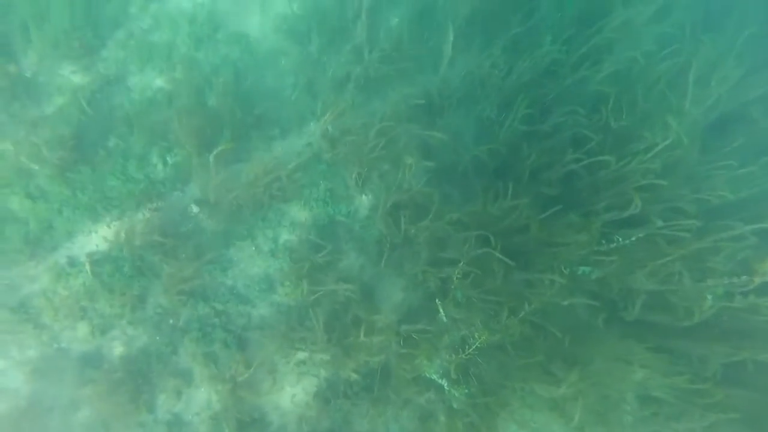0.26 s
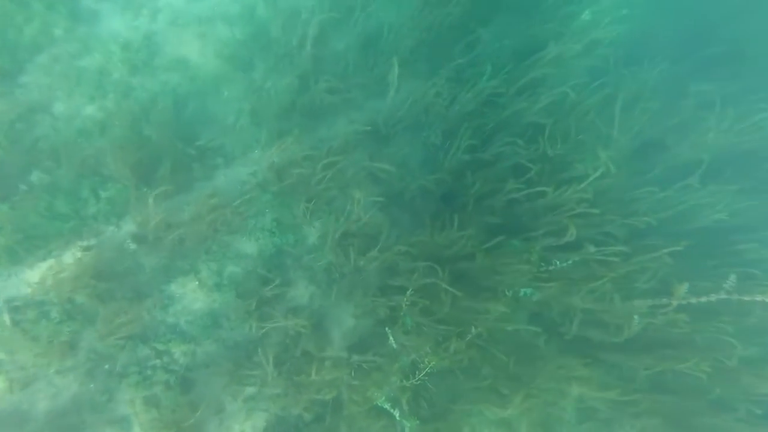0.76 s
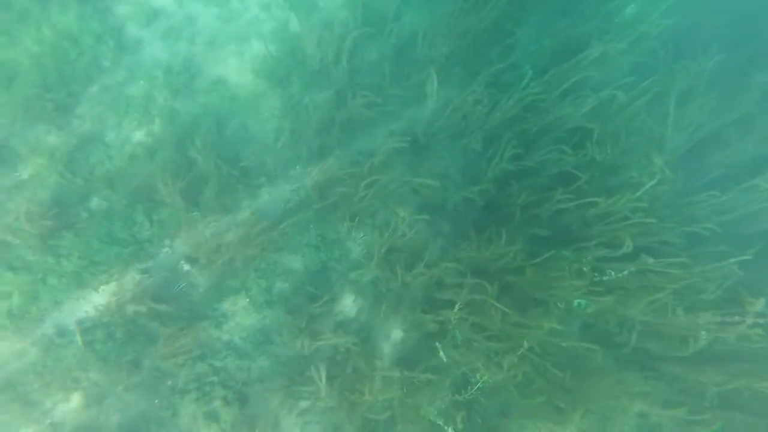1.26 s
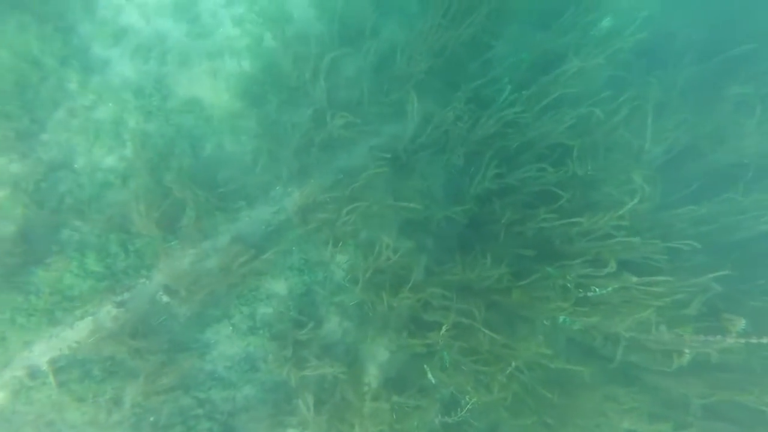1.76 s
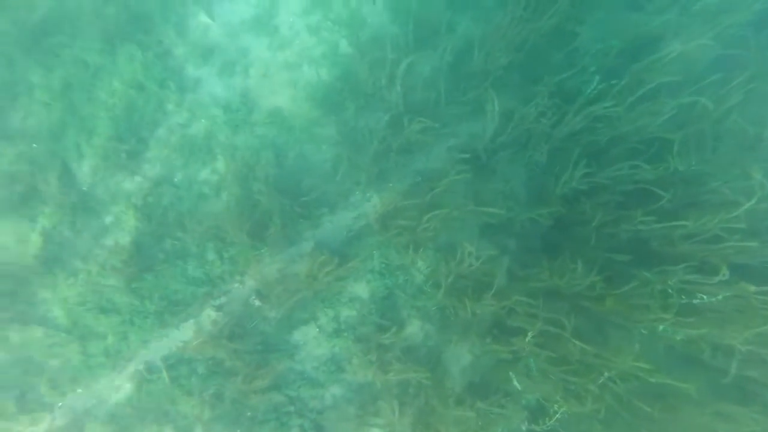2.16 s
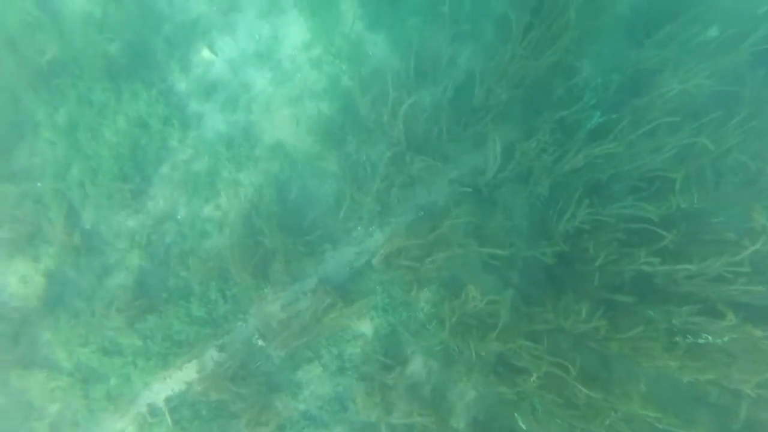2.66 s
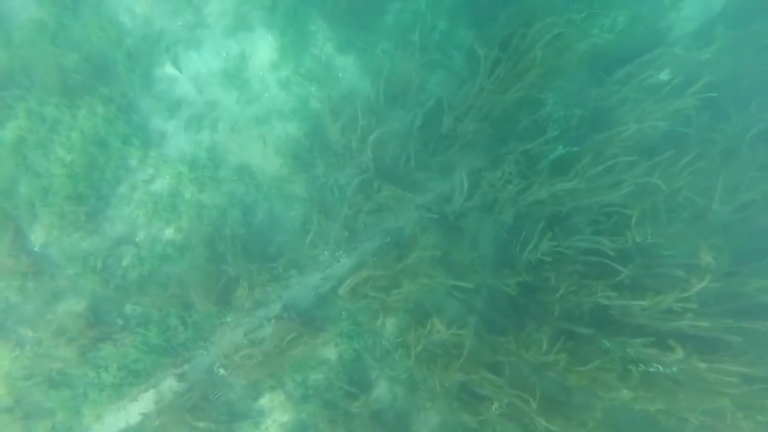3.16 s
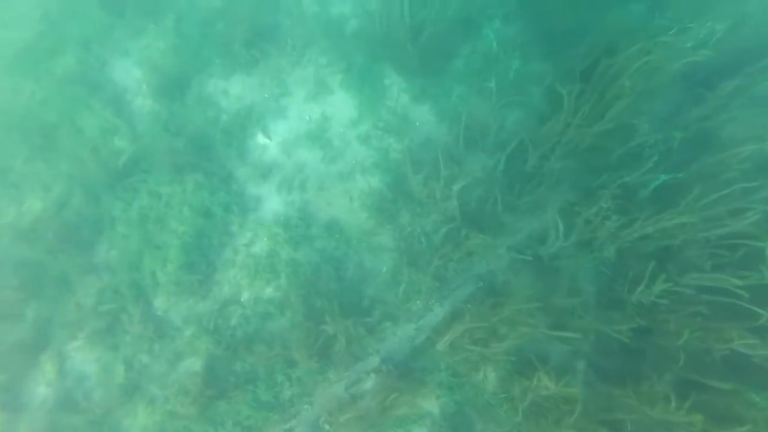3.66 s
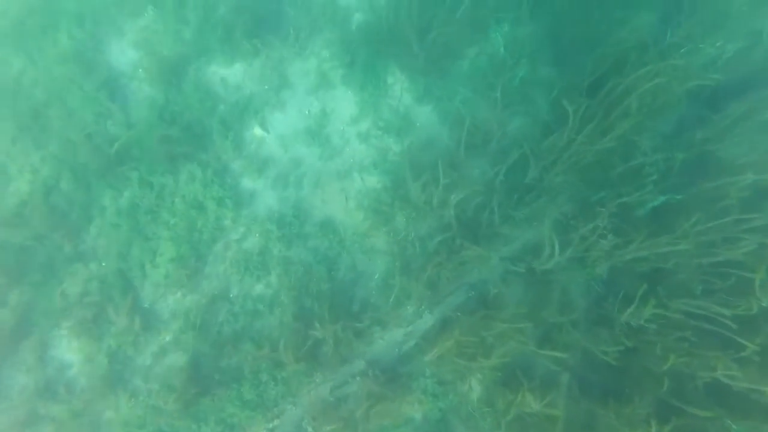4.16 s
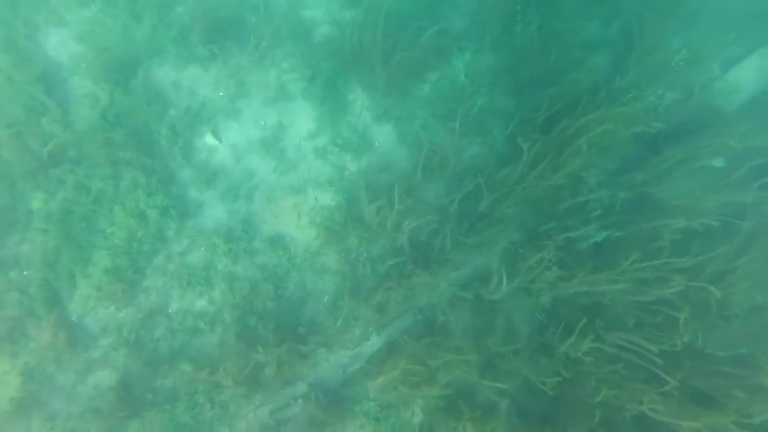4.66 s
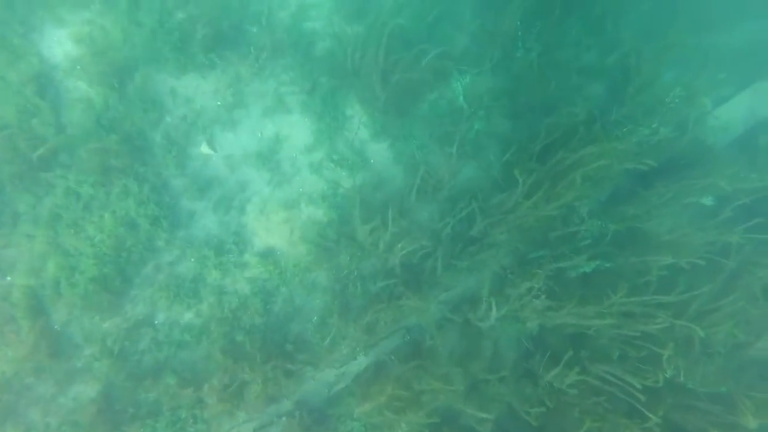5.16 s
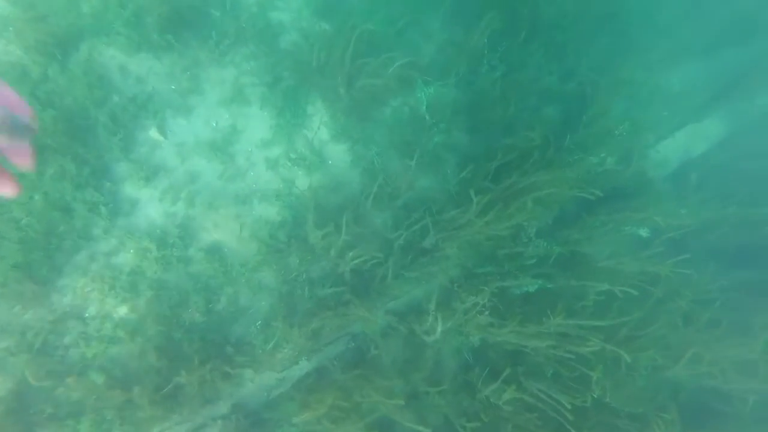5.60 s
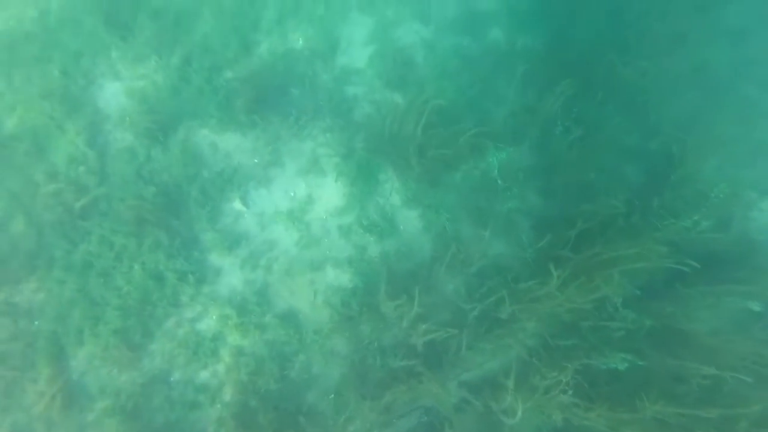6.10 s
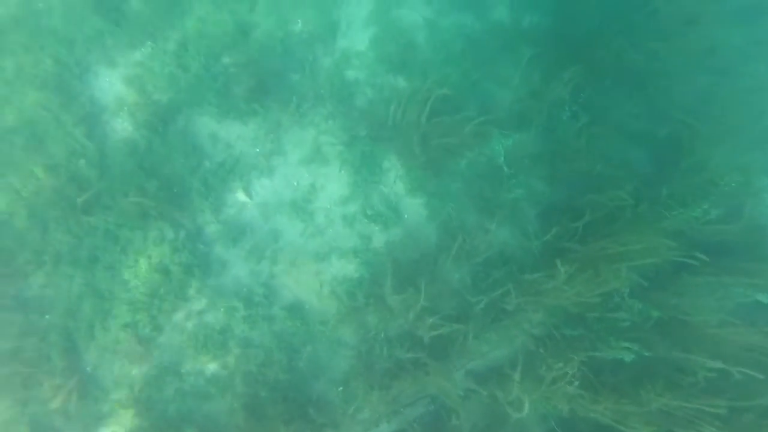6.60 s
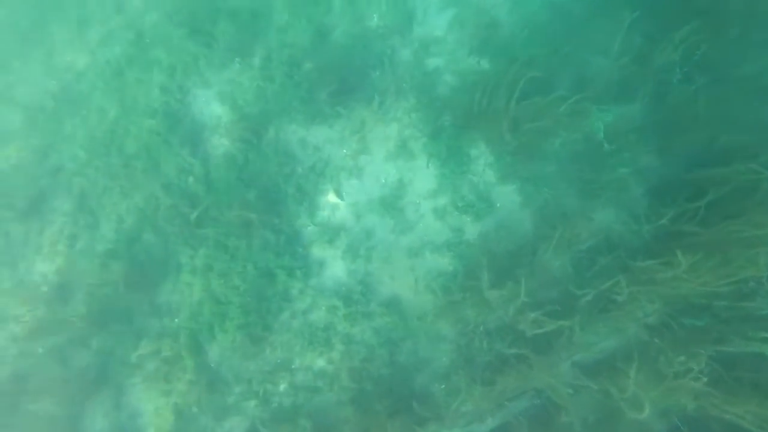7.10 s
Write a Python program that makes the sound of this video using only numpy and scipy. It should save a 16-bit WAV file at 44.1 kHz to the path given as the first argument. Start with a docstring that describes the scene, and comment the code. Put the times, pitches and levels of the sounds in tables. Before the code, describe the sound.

Muffled underwater rumble surges against a submerged camera, with soft thumps, faint gurgling bubbles and a few dull knocks and clicks.

```python
"""Water surges against a camera's waterproof case as it is moved through a shallow lake.
Each push swells a low turbulent rumble, with soft thumps from large eddies. Clouds of ringing bubbles
gurgle and fizz around the case, which takes dull knocks and clicks a few times.
Its wall muffles everything above 3 kHz, leaving a faint thin hiss on top."""
import sys
import numpy as np
from scipy import signal
from scipy.fft import rfft, irfft, next_fast_len
from scipy.io import wavfile
from scipy.ndimage import uniform_filter1d

SR = 44100
rng = np.random.default_rng(int(sys.argv[2]) if len(sys.argv) > 2 else 0)


def store_wav(level_fs):
    """Save 16-bit WAV to argv[1]."""
    pcm = np.round(np.clip(np.atleast_2d(level_fs), -1, 1) * 32767)
    wavfile.write(sys.argv[1], SR, pcm.T.astype(np.int16))


N = 323694
TIME_S = np.arange(N) / SR
WALL_HZ = 3170  # low-pass corner of the case wall


def undb(db):
    """Decibels to gain."""
    return 10 ** (np.asarray(db) / 20)


def unit(x):
    """Scale to rms 1."""
    return x / np.sqrt(np.mean(x ** 2))


def curve(table):
    """Linear interpolation of (time, value) rows."""
    times_s, values = np.transpose(table)
    return np.interp(TIME_S, times_s, values)


def colour(x, spectrum):
    """Minimum-phase filter through (frequency [Hz], gain [dB]) points."""
    hz, db = np.transpose(spectrum)
    size = next_fast_len(N + SR // 2, real=True) // 2 * 2
    bins_hz = np.arange(size // 2 + 1) * SR / size
    gain_db = np.interp(np.log(bins_hz + 1), np.log(hz), db)
    cepstrum = irfft(np.log(undb(gain_db)))
    cepstrum[1:size // 2] *= 2  # fold onto the causal half
    cepstrum[size // 2 + 1:] = 0
    return irfft(rfft(x, size) * np.exp(rfft(cepstrum)))[:N]


def hold_rms(x, span_s):
    """Hold the running rms near 1, keeping faster detail."""
    size = int(span_s * SR) + 1
    power = uniform_filter1d(uniform_filter1d(x ** 2, size), size)
    return x / np.sqrt(power + 1e-12)


def add(out, start_s, sound):
    """Mix a sound in from start_s."""
    start = int(round(start_s * SR))
    first, last = max(start, 0), min(start + len(sound), N)
    if last > first:
        out[first:last] += sound[first - start:last - start]


def swell_power(table, roundness=1.6):
    """Summed power of events that rise and ebb; roundness 1 is a sharp crest, 2 a bell."""
    power = np.zeros(N)
    for crest_s, db, rise_s, ebb_s in table:
        distance = np.maximum((crest_s - TIME_S) / rise_s, (TIME_S - crest_s) / ebb_s)
        power += undb(db) ** 2 * np.exp(-2 * distance ** roundness)
    return power


def wander(rate_hz):
    """Smoothed random steps, rms 1."""
    size = int(SR / rate_hz)
    steps = rng.standard_normal(1000)[np.arange(N) // size % 1000]
    return unit(uniform_filter1d(steps, size))


def rumble(gain_db=-1, floor_db=-29, buffet_db=3.5, buffet_hz=14):
    """Turbulent pressure on the case swells with each surge and buffets unevenly."""
    # pressure spectrum: (frequency [Hz], gain [dB])
    spectrum = [(12, -17.5), (24, -2), (45, 3.5), (70, -1.5), (115, -5.5), (160, -12.5), (220, -25),
                (320, -30.5), (600, -56), (1500, -78.5)]
    # water surges, about three a second: (crest time [s], level [dB], rise [s], ebb [s])
    surges = [(.02, -17.5, .1, 0.26), (.46, -36, .04, 0.039), (1.02, -26.5, 0.068, 0.098),
              (1.3, -18, 0.14, 0.39), (1.7, -18, 0.029, 0.087), (2.11, -22, 0.11, 0.27),
              (2.46, -16, 0.057, 0.15), (2.74, -26, .06, 0.14), (3.1, -19, 0.164, 0.23),
              (3.57, -25.5, 0.04, 0.23), (3.88, -21, 0.074, 0.13), (4.1, -24.5, 0.027, 0.2),
              (4.4, -22, 0.16, 0.15), (4.65, -21, 0.036, 0.24), (5.17, -35, .06, 0.031),
              (5.67, -18.5, 0.2, .16), (5.94, -13.5, 0.11, 0.059), (6.16, -22.5, 0.059, 0.049),
              (6.43, -17.5, 0.16, 0.097), (6.62, -38, 0.043, .1), (6.9, -20.5, 0.04, 0.07),
              (7.23, -15.5, 0.18, 0.14)]
    pressure = hold_rms(colour(rng.standard_normal(N), spectrum), span_s=0.034)
    muffled = signal.sosfilt(signal.butter(4, WALL_HZ, fs=SR, output="sos"), pressure)
    flow = np.sqrt(undb(floor_db) ** 2 + swell_power(surges))
    return muffled * flow * undb(gain_db + buffet_db * wander(buffet_hz))


def bubble(hz, cycles, glide=0.021, onset_cycles=1.9):
    """A bubble swells into its ring and decays 60 dB over `cycles` while its pitch creeps up."""
    turns = np.arange(int(cycles / hz * SR)) * hz / SR
    age = turns / cycles
    envelope = (1 - np.exp(-(turns / onset_cycles) ** 2)) * np.exp(-np.log(1000) * age)
    return envelope / envelope.max() * np.sin(2 * np.pi * turns * (1 + glide * age))


def bubble_cloud(low_hz, high_hz, count, scatter_db, cycles, wash_db):
    """Bubbles of random size over a noise wash, heard through the case wall."""
    # bubble colour inside the case: (frequency [Hz], gain [dB])
    spectrum = [(150, -13.5), (300, -13), (390, -7), (480, -0.5), (620, -1.5), (800, -1), (1080, -5),
                (1300, -13), (1900, -14), (2700, -20), (3200, -32.5), (4200, -41.5), (6000, -68.5)]
    rings = np.zeros(N)
    for when, pitch, weakness, sustain in rng.random((count, 4)):
        hz = low_hz * (high_hz / low_hz) ** pitch
        ring = bubble(hz, cycles * (0.5 + sustain), glide=0.093)
        add(rings, when * N / SR, ring * undb(-scatter_db * np.log(0.031 + weakness)))
    band = signal.butter(4, [low_hz, high_hz], "band", fs=SR, output="sos")
    wash = signal.sosfilt(band, rng.standard_normal(N))
    cloud = unit(rings) + undb(wash_db) * unit(wash)
    return hold_rms(colour(cloud, spectrum), span_s=0.072)


def bubbling(fizz_db=-17, churn_db=1.04, churn_hz=7):
    """Large bubbles gurgle, small ones fizz along and in puffs, and a few near ones stand out."""
    # gurgle strength: (time [s], level [dB])
    gurgle_levels = [(0.0, -33.5), (0.22, -38.5), (0.55, -33.5), (0.92, -35.5), (1.2, -33.5), (1.6, -33.5),
                     (2.0, -36), (2.33, -34), (3.2, -36.5), (3.95, -33.5), (4.45, -31.5), (4.85, -33.0),
                     (5.05, -37.5), (5.45, -39), (6.0, -33.5), (6.75, -35), (7.0, -31.5), (7.34, -33)]
    # puffs of fine bubbles: (crest time [s], level [dB], rise [s], ebb [s])
    puffs = [(1.86, -48, 0.066, 0.11), (2.3, -53, 0.065, 0.19), (3.87, -50.5, 0.062, 0.073),
             (4.72, -48, 0.034, 0.093), (5.66, -49.5, 0.36, 0.25), (6.4, -52.5, 0.077, 0.092),
             (7.24, -49, 0.031, 0.031)]
    # single near bubbles: (time [s], pitch [Hz], peak [dB])
    near_bubbles = [(0.445, 472, -24), (0.653, 1700, -37.5), (1.135, 568, -25), (1.183, 617, -21.5),
                    (1.6, 2300, -36), (1.634, 504, -25.5), (2.229, 535, -25.5), (2.231, 1367, -33),
                    (2.333, 600, -28), (2.581, 446, -31), (3.112, 860, -27), (3.545, 777, -23.5),
                    (3.846, 980, -25), (3.868, 2720, -37), (3.888, 1310, -31.5), (3.888, 2270, -35),
                    (4.347, 492, -24), (4.385, 501, -18), (4.669, 2650, -39), (6.514, 743, -27.5),
                    (6.862, 1360, -27), (6.929, 1025, -19), (6.94, 930, -24), (7.298, 2207, -37)]
    gurgle = bubble_cloud(low_hz=221.8, high_hz=1256, count=2400, scatter_db=3, cycles=44.5, wash_db=-3.5)
    fizz = bubble_cloud(low_hz=1262, high_hz=3835, count=1800, scatter_db=4, cycles=76, wash_db=1)
    gurgle_gain = undb(curve(gurgle_levels))
    fizz_gain = np.sqrt((gurgle_gain * undb(fizz_db)) ** 2 + swell_power(puffs))
    out = (gurgle * gurgle_gain + fizz * fizz_gain) * undb(churn_db * wander(churn_hz))
    for start_s, hz, db in near_bubbles:
        add(out, start_s, undb(db) * bubble(hz, cycles=40))
    return out


def hiss():
    """Thin noise peaking near 6.5 kHz creeps up, drops and creeps up again."""
    # hiss spectrum: (frequency [Hz], gain [dB])
    spectrum = [(2500, -20), (4500, -19), (5900, -14), (6200, -9.5), (6450, 0), (7000, -6.5), (9200, -12),
                (10300, -20.5), (12000, -16), (13500, -23), (15000, -25.5)]
    # hiss strength: (time [s], level [dB])
    levels = [(0.05, -70), (1.12, -67), (4.87, -63), (4.96, -67.5), (5.5, -65), (7.3, -64)]
    return unit(colour(rng.standard_normal(N), spectrum)) * undb(curve(levels))


def thumps(gain_db=-1):
    """Large eddies rock the case briefly, swelling and fading symmetrically; one short low push also comes with
    the blow on the case at 1.52 s."""
    # eddies, plus the low push of a blow at 1.523 s: (crest time [s], level [dB], pitch [Hz], half-width [s])
    eddies = [(0.045, -9, 75.6, 0.06), (0.073, -12, 76.5, 0.018), (.701, -5, 109, 0.01),
              (1.268, -5, 54, 0.03), (1.291, -6, 52, 0.024), (1.523, -9, 81.5, 0.0087),
              (2.16, -7.5, 76, 0.02), (2.44, -1.5, 67, 0.0088), (2.464, -8.5, 99.7, 0.049),
              (2.721, -16, 145, 0.019), (2.958, -12, 98.7, 0.024), (3.888, -14, 100, 0.025),
              (4.093, -9, 49.3, 0.051), (4.959, -3, 90, 0.02), (5.672, -15, 58, 0.035),
              (5.795, -6, 75, 0.012), (5.996, -3.5, 87.5, 0.0057), (6.378, -5.5, 86, 0.0095),
              (6.423, -9, 62, 0.034), (6.461, -8, 45.7, 0.031), (7.231, -6, 62, 0.0069)]
    out = np.zeros(N)
    for crest_s, db, hz, half_s in eddies:
        t = np.arange(-2 * half_s, 2 * half_s, 1 / SR)
        envelope = np.exp(-np.log(16) * (t / half_s) ** 2)
        rocking = np.sin(2 * np.pi * (hz * t + rng.random()))
        add(out, crest_s - 2 * half_s, undb(db + gain_db) * envelope * rocking)
    return out


def knocks(rise_s=0.0049):
    """Light bumps on the case, damped by the water within a few cycles."""
    # bumps: (time [s], pitch [Hz], peak [dB])
    bumps = [(0.05, 198, -14.5), (0.196, 200, -26), (1.244, 350, -18.5), (2.447, 199, -23),
             (2.698, 230, -24), (2.812, 213, -19), (3.134, 196, -23), (4.484, 226, -24.5),
             (4.948, 171, -22.5), (5.666, 207, -23), (5.889, 203, -25.5), (6.58, 176, -16.5)]
    t = np.arange(SR // 20) / SR
    envelope = (t / rise_s * np.exp(1 - t / rise_s)) ** 2
    out = np.zeros(N)
    for start_s, hz, db in bumps:
        add(out, start_s, undb(db) * envelope * np.sin(2 * np.pi * hz * t))
    return out


def ticks(gain_db=-6, band_hz=(3000, 7500)):
    """Faint high ticks: fast-decaying bursts of noise."""
    # bursts: (time [s], level [dB], decay [s])
    bursts = [(1.2008, -52, .003), (4.824, -44.5, .003), (4.912, -48, 0.0041)]
    t = np.arange(SR // 50) / SR
    band = signal.butter(2, band_hz, "band", fs=SR, output="sos")
    out = np.zeros(N)
    for start_s, db, decay_s in bursts:
        noise = unit(signal.sosfilt(band, rng.standard_normal(len(t))))
        add(out, start_s, undb(db + gain_db) * noise * np.exp(-t / decay_s))
    return out


def clicks(contact_s=0.00041, first_gap_s=0.001103):
    """Short blows ring the water-damped case; rebounds come ever weaker and closer together."""
    # case modes: (frequency [Hz], relative level [dB], T60 [s])
    modes = [(560, -19, 0.011), (1070, 3, 0.0082), (1400, 0.5, 0.0071), (1870, -5.5, 0.01),
             (2420, -14, 0.018)]
    # blows: (time [s], peak [dB], amplitude kept per rebound [0-1])
    blows = [(1.4776, -15.5, 0), (1.521, -10.5, 0.69), (1.5702, -16, 0.43)]
    t = np.arange(SR // 20) / SR
    ring = sum(undb(db) * np.sin(2 * np.pi * hz * t) * np.exp(-np.log(1000) * t / t60_s)
               for hz, db, t60_s in modes)
    contact = signal.windows.hann(int(contact_s * SR) + 3)
    wall = signal.butter(6, WALL_HZ, fs=SR, output="sos")
    click = signal.sosfilt(wall, np.convolve(ring, contact))
    click /= np.abs(click).max()
    out = np.zeros(N)
    for start_s, db, kept in blows:
        for bounce in range(4):
            add(out, start_s + first_gap_s * bounce ** 0.793, kept ** bounce * undb(db) * click)
    return out


def scene():
    """Mono sum at the microphone inside the case."""
    return (rumble() + thumps() + knocks() + bubbling() + clicks() + hiss() + ticks())[None]


def record(dry, cutoff_hz=14000):
    """The camera cuts the top with a steep low-pass."""
    return signal.sosfilt(signal.ellip(8, 0.2, 70, cutoff_hz, fs=SR, output="sos"), dry)


dry = scene()
out = record(dry)
store_wav(out)
```